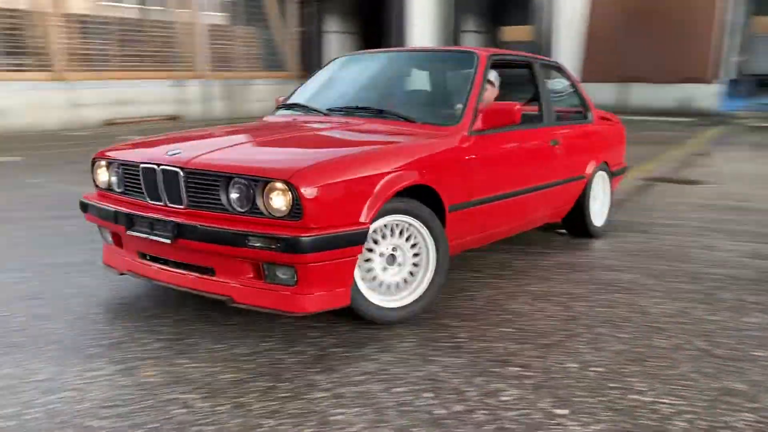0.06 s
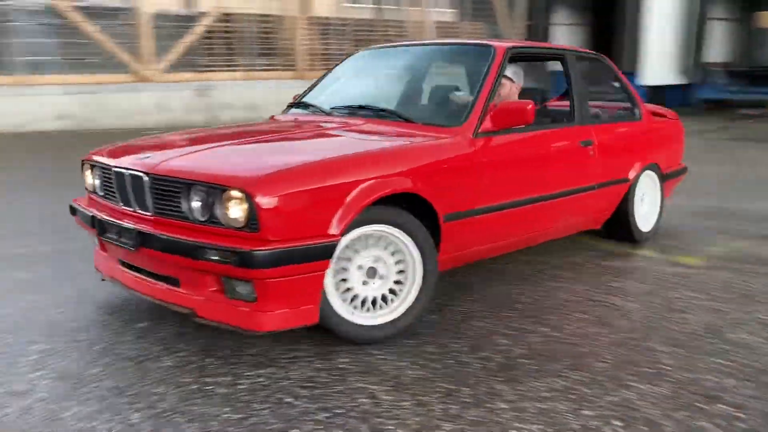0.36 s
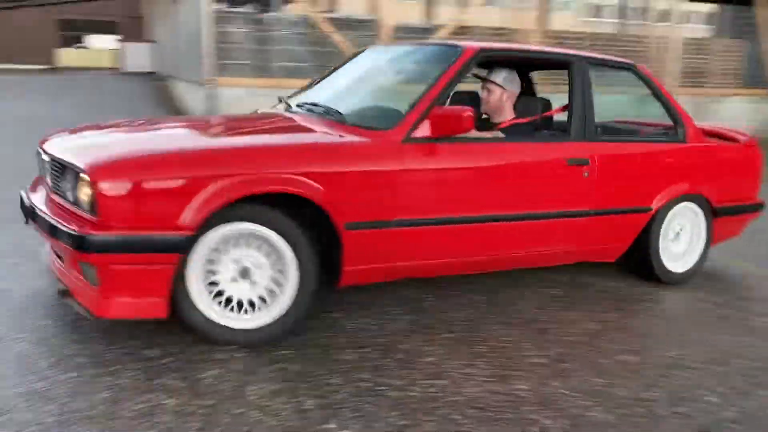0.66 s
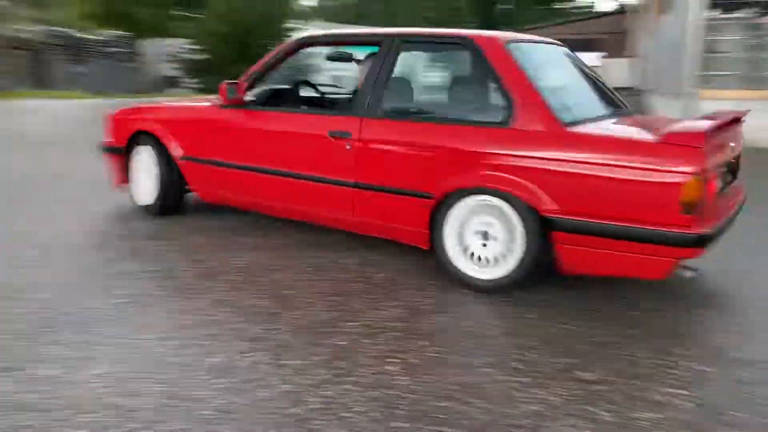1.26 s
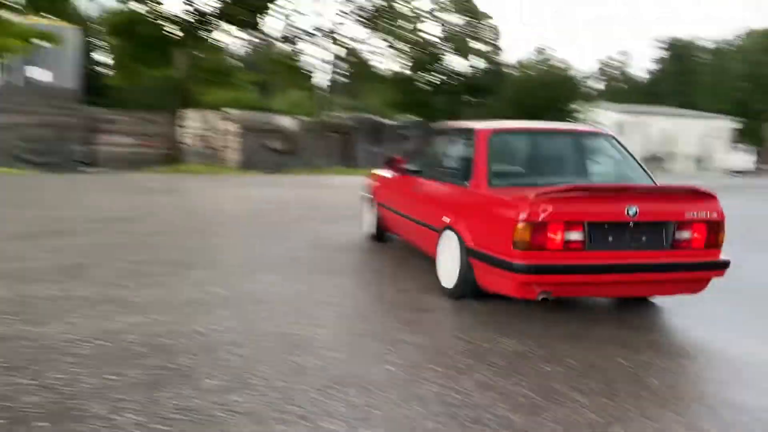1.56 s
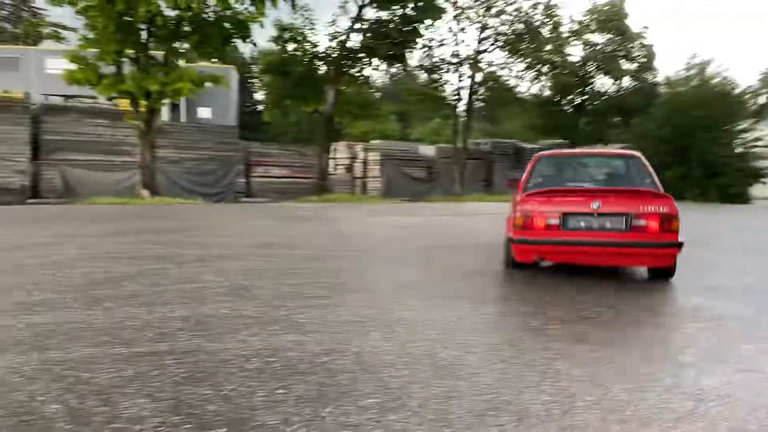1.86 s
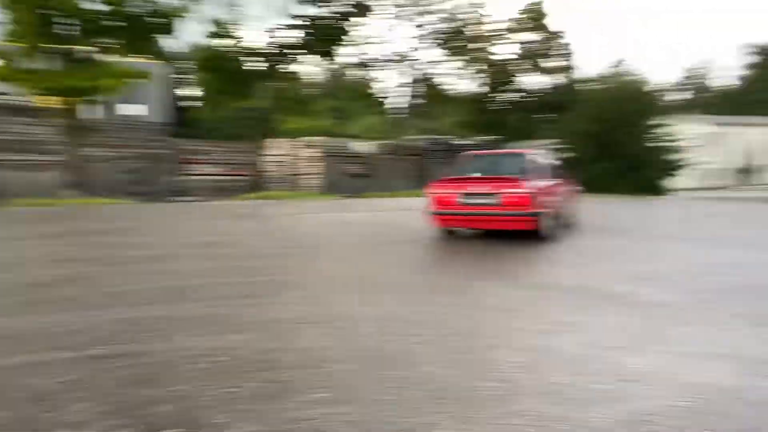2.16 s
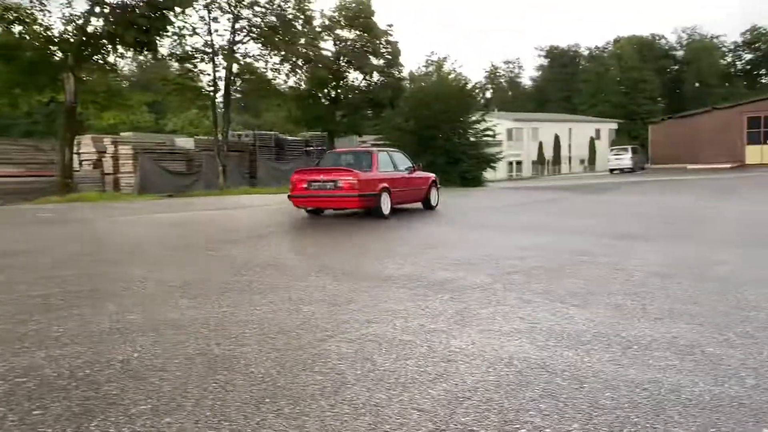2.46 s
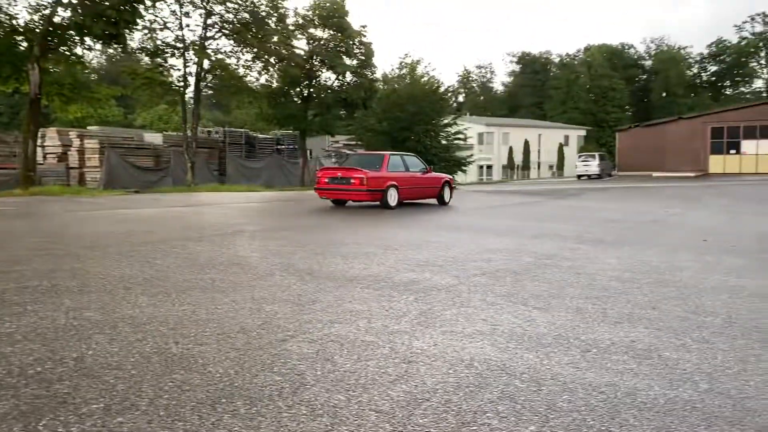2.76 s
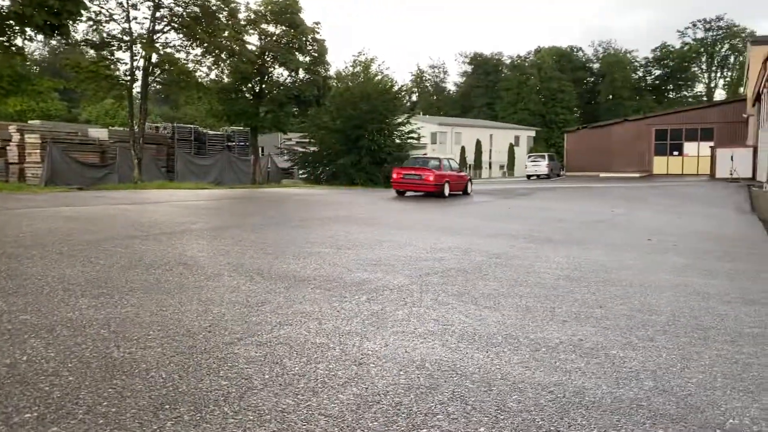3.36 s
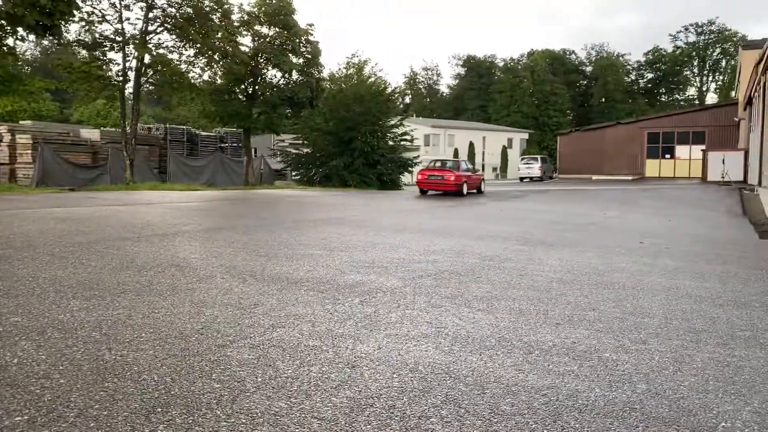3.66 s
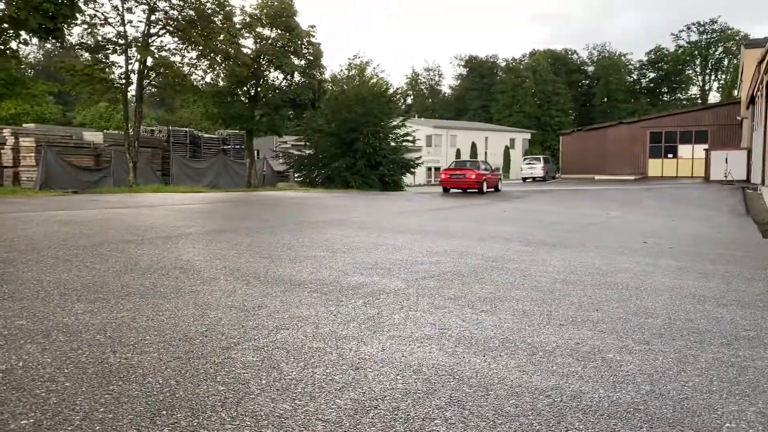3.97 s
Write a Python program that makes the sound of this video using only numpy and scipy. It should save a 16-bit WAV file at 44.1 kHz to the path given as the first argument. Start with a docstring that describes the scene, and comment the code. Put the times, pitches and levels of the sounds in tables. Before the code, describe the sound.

A car drifts past with a booming exhaust and hissing, chirping tyres, fading into the distance.

```python
"""An open yard, wet asphalt: a four-cylinder car drifts past close by and slides away.
The exhaust booms, growls and puffs at the firing rate, unequal cylinders add a burble, and each firing
rings the engine into a rasp. The tyres scrub, stick and slip in short squeals, throw spray and flick grit.
Wind buffets the microphone; sheds and stacks return dull echoes."""
import sys
import numpy as np
from scipy import signal
from scipy.fft import rfft, irfft
from scipy.io import wavfile

SR = 44100
rng = np.random.default_rng(int(sys.argv[2]) if len(sys.argv) > 2 else 0)


def wav_record(signal):
    """Record a signal, one row per channel, as 16-bit PCM in the file named by sys.argv[1]."""
    frames = np.transpose(np.atleast_2d(signal))
    bounded = np.clip(frames, -1, 1)
    # unit amplitude maps onto the largest positive 16-bit level
    quanta = np.round(bounded * 32767).astype(np.int16)
    wavfile.write(sys.argv[1], SR, quanta)


N = 176400


def from_db(db):
    """Decibels to gain."""
    return 10 ** (np.asarray(db) / 20)


def unit_rms(x):
    """Scale to rms 1."""
    return x / np.sqrt(np.mean(x ** 2) + 1e-20)


def in_time(rows):
    """Table columns as curves over time."""
    times, *columns = np.transpose(rows)
    return [np.interp(np.arange(N) / SR, times, column) for column in columns]


def per_bin(points):
    """A table over log frequency, read at every FFT bin."""
    hz, value = np.transpose(points)
    return np.interp(np.log(np.arange(N // 2 + 1) * SR / N + 1), np.log(hz), value)


def coloured(x, spectrum_db):
    """Filter by a spectrum table; rms 1."""
    return unit_rms(irfft(rfft(x) * from_db(per_bin(spectrum_db)), N))


def drift(corner_hz):
    """Low-passed random wander; rms 1."""
    hz = np.arange(N // 2 + 1) * SR / N
    return unit_rms(irfft(rfft(rng.standard_normal(N)) / (1 + (hz / corner_hz) ** 2), N))


def pan(x, db):
    """Stereo, left louder than right by db."""
    return x * from_db(np.array([[.5], [-.5]]) * db)


# Each row: frequency in Hz, left-right correlation of tyre and gas noise (-1 to 1).
CORRELATION = [(200, 0.82), (600, 0.63), (1000, 0.37), (2200, 0.56), (3300, 0.38), (7000, 0.21),
               (8400, 0.16), (11000, -0.12), (13400, 0.23), (15400, 0.11)]

def wide_noise(spectrum_db):
    """Coloured stereo noise, partly correlated; rms 1."""
    mid, side = rfft(rng.standard_normal((2, N)))
    alike = per_bin(CORRELATION)
    channels = np.sqrt(1 + alike) * mid + np.sqrt(1 - alike) * side * [[1], [-1]]
    return coloured(irfft(channels, N), spectrum_db)


# Each row: time in seconds, firing rate in Hz.
FIRING_HZ = [(0, 208), (.09, 186.6), (.17, 185.3), (.38, 197.7), (.44, 191.5), (.54, 170), (.68, 165.6),
             (.85, 153), (1.1, 164.6), (1.19, 159.8), (1.29, 143.7), (1.45, 149.1), (2.0, 179.3),
             (2.33, 198.8), (2.5, 210.5), (2.75, 211.6), (3.05, 203.2), (3.35, 165.6), (3.65, 145.1),
             (4, 128.9)]

def firing_cycles():
    """Running count of firings; engine speed wanders slightly."""
    return np.cumsum(in_time(FIRING_HZ)[0] * (1 + .003 * drift(17.7))) / SR


def order_tone(cycles, multiple, db, waver_db):
    """One engine order: a sine locked to the crank, wavering in level."""
    gain = np.sqrt(2) * from_db(db + waver_db * drift(7.9))
    return gain * np.sin(2 * np.pi * (multiple * cycles + rng.random()))


# Each row: time in seconds, boom level in dB.
BOOM_DB = [(0, -18), (.4, -16), (.55, -21), (.72, -19), (.85, -26), (1.03, -17), (1.15, -24), (1.38, -19),
           (1.48, -22), (1.53, -37), (1.59, -27), (1.95, -23), (2.2, -30), (2.32, -47), (2.4, -28.5),
           (2.505, -25), (2.53, -33.5), (2.68, -32), (2.74, -28.5), (2.85, -31.5), (2.98, -33.5),
           (3.09, -33.5), (3.2, -47.5), (3.4, -38.5), (3.6, -41.5), (3.92, -34), (4, -38)]
# The boom wavers more as the car draws away. Each row: time in seconds, spread in dB.
BOOM_WAVER_DB = [(0, -0.34), (2.5, 0), (2.85, 3), (3.3, 7.5), (4, 3)]
# Strongest from about 0.85 to 1.6 s. Each row: time in seconds, 2nd and 3rd harmonic in dB.
GROWL_DB = [(0, -52, -47), (.4, -44, -49.5), (.76, -56, -46), (.85, -32.5, -46), (1.05, -39.5, -41.5),
            (1.17, -56, -42.5), (1.33, -36, -45), (1.47, -34, -46), (1.62, -33.5, -38), (1.78, -49, -47),
            (2.1, -46.5, -50), (2.7, -43, -58), (3.2, -61, -71), (4, -61, -70)]
# Each row: time in seconds, burble gain in dB.
BURBLE_DB = [(0, -1), (.4, -10), (.55, 0), (.77, 1.5), (.85, 3), (1.12, 7.5), (1.25, -3), (1.6, -2.5),
             (1.9, -2), (2.3, -9), (2.7, -16), (3.2, -22), (4, -18)]
# Each row: multiple of the firing rate, level in dB before the burble gain.
BURBLE_ORDERS = [(.5, -40.5), (.75, -41), (1.25, -49), (1.5, -39.5), (2.5, -54.5)]

def exhaust(cycles):
    """Boom at the firing rate, growl from two overtones, burble from unequal cylinders."""
    boom_db = in_time(BOOM_DB)[0] + in_time(BOOM_WAVER_DB)[0] * drift(28.5)
    boom = np.sqrt(2) * from_db(boom_db) * np.sin(2 * np.pi * cycles)
    growl = sum(order_tone(cycles, k, db, waver_db=3) for k, db in enumerate(in_time(GROWL_DB), 2))
    burble_db, = in_time(BURBLE_DB)
    burble = sum(order_tone(cycles, k, burble_db + db, waver_db=2.5) for k, db in BURBLE_ORDERS)
    return boom + growl + burble


# Loudest while the pipe faces the microphone. Each row: time in seconds, level in dB.
PUFF_DB = [(0, -65), (1.15, -47), (1.35, -37), (1.58, -39.5), (1.85, -42), (2.15, -42), (2.9, -46),
           (4, -62)]
# Each row: frequency in Hz, relative level in dB.
PUFF_SPECTRUM_DB = [(150, 11), (330, 4), (450, 10), (700, 6.5), (1500, -18), (2100, -32), (2900, 1.5),
                    (4200, -5), (5500, -40), (12000, -45)]

def tailpipe(cycles, depth=.37):
    """Rushing gas, one puff per firing."""
    puffs = 1 + depth * np.sin(2 * np.pi * cycles)
    return from_db(in_time(PUFF_DB)[0]) * puffs * wide_noise(PUFF_SPECTRUM_DB)


# Each row: time in seconds, rasp level in dB.
RASP_DB = [(0, -31.5), (.35, -31.5), (.75, -37), (1.05, -28.5), (1.25, -35.5), (1.5, -33), (1.8, -37),
           (2.05, -36), (2.3, -37.5), (2.8, -35.5), (3.1, -70), (4, -57)]
# Each row: frequency in Hz, relative level in dB.
RASP_SPECTRUM_DB = [(300, -35), (480, -7.5), (610, -5.5), (780, 1), (1030, 4), (1350, -3.5), (1560, -14.5),
                    (1880, -4.5), (2200, -9), (2600, -16.5), (3400, -19.5), (4600, -31.5), (8000, -39)]

def rasp(cycles, cylinders=4, cylinder_spread=.49, roughness=.59, decay_s=.0052):
    """Each firing sets off a brief broadband ring, slightly different for each cylinder."""
    firings = np.flatnonzero(np.diff(np.floor(cycles)))
    t, out = np.arange(SR // 25) / SR, np.zeros(N)
    shared = rng.standard_normal(len(t))
    strength = 1 + roughness * rng.standard_normal(N)
    for k in range(cylinders):
        clicks = np.zeros(N)
        clicks[firings[k::cylinders]] = strength[k:len(firings):cylinders]
        noise = shared + cylinder_spread * rng.standard_normal(len(t))
        spectrum = rfft(noise * np.exp(-t / decay_s))
        white_ring = irfft(spectrum / np.abs(spectrum))
        out += signal.fftconvolve(clicks, white_ring)[:N]
    return from_db(in_time(RASP_DB)[0]) * coloured(out, RASP_SPECTRUM_DB)


# Each row: start and length in seconds, start and end pitch in Hz, level in dB,
# octave in dB relative to the tone, roughness (0 to 1).
SQUEAL_BURSTS = [(-.02, 0.033, 917, 976, -16, -12, 0.28), (0.017, 0.024, 1032, 980, -23, -18, .6),
                 (0.076, 0.026, 976, 944, -35, -20, .5), (0.162, 0.025, 1140, 1133, -21, -27, 0.26),
                 (0.182, 0.028, 1090, 1156, -17.5, -24, 0.16), (.24, .06, 895, 1001, -23, -24, 0.42),
                 (0.346, .065, 1004, 1032, -35, -3.5, 0.9), (0.495, 0.023, 963, 939, -24, -10.5, 0.17),
                 (0.538, 0.047, 980, 938, -29.5, -18, 0.5), (0.701, 0.021, 865, 900, -26.5, -18, 0.9),
                 (0.804, 0.03, 817, 857, -31.5, -25, .7), (2.135, 0.036, 869, 904.4, -37, -24, 0.88),
                 (2.175, 0.0862, 832, 752, -35.5, -9, 0.7), (2.259, 0.073, 742, 742, -32, -8.5, 0.34),
                 (2.354, 0.075, 701, 731, -33.5, -3.5, 0.34), (2.426, 0.095, 935.6, 862.5, -22, -13, 0.19),
                 (2.525, 0.088, 848.4, 828, -28, -6.5, 0.63), (2.609, 0.079, 833, 808.8, -27, -8, 0.8),
                 (2.678, 0.097, 772, 776.4, -29, -10, 0.73), (2.785, 0.15, 810, 835, -36.5, -10.5, .9)]

def squeals(attack_s=.008, release_s=.023, width_hz=136):
    """Tread sticks and slips: a gliding tone and its octave, roughened by blocks slipping out of step."""
    t, out = np.arange(N) / SR, np.zeros(N)
    jitter = 1 + .021 * drift(148)
    flutter = from_db(.06 * drift(31))
    scatter = np.array([drift(width_hz) + 1j * drift(width_hz) for _ in range(2)])
    for start_s, length_s, start_hz, end_hz, db, octave_db, rough in SQUEAL_BURSTS:
        on = (t > start_s) & (t < start_s + length_s + release_s / 2)
        age = t[on] - start_s
        tone, octave = (1 + rough * scatter[:, on]) / np.sqrt(1 + 2 * rough ** 2)
        hz = (start_hz + (end_hz - start_hz) * age / length_s) * jitter[on]
        phasor = np.exp(2j * np.pi * np.cumsum(hz) / SR)
        envelope = np.clip(np.minimum(age / attack_s, (length_s - age) / release_s + .5), 0, 1)
        wave = np.real(tone * phasor + from_db(octave_db) * octave * phasor ** 2)
        out[on] += from_db(db) * envelope * wave
    return np.sqrt(2) * out * flutter


# Each row: time in seconds, scrub level in dB, hiss level in dB.
SCRUB_HISS_DB = [(0, -31, -37.5), (.38, -32, -37), (.6, -31.5, -40), (.78, -34.5, -43), (.88, -33.5, -40.5),
                 (1.1, -32.5, -38.5), (1.22, -36.5, -42), (1.48, -32.5, -47), (1.8, -37, -48.5),
                 (2.08, -38, -52), (2.3, -36.5, -46.5), (2.5, -28.5, -43), (2.72, -33.5, -43),
                 (2.9, -33.5, -43.5), (3.1, -40.5, -51), (3.45, -44.5, -53), (3.7, -46, -57),
                 (4, -51, -60.5)]
# Each row: time in seconds, spray level in dB.
SPRAY_DB = [(0, -42.5), (.35, -39), (.56, -45.5), (.66, -40), (.78, -46.5), (.85, -36.5), (.93, -35.5),
            (1.13, -35.5), (1.2, -45.5), (1.25, -46), (1.29, -42), (1.8, -46.5), (2.12, -53), (2.65, -49.5),
            (2.88, -51), (3.1, -61), (3.45, -66.5), (3.7, -79), (4, -72)]
# Three spectra. Each row: frequency in Hz, relative level in dB.
SCRUB_SPECTRUM_DB = [(100, 6), (300, 1), (550, -4.5), (850, 0), (1100, 0.5), (1300, -1.5), (1540, -5),
                     (1950, -0.5), (2250, -2.5), (2700, -11), (5000, -30), (9000, -90)]
HISS_SPECTRUM_DB = [(800, -34), (2000, -1.5), (3500, 4), (5000, -1), (7000, -5.5), (9000, -25.5),
                    (12000, -12), (15000, -55)]
SPRAY_SPECTRUM_DB = [(2500, -69), (6000, -5.5), (8500, -7), (10800, -2.5), (12500, -14.5), (14500, -9.5),
                     (15800, -6.5)]

def wet_tyres(scrub_pan_db, drops_per_s=600, drops_db=-16, drop_spread_db=6.5):
    """Rubber scrubs over stones; the water film hisses, breaks into drops and flies off as spray."""
    scrub_db, hiss_db = in_time(SCRUB_HISS_DB)
    hits = rng.random(N) < drops_per_s / SR
    sizes = from_db(drop_spread_db * np.minimum(rng.exponential(1, N), 4))
    drops = coloured(hits * sizes * rng.standard_normal((2, N)), HISS_SPECTRUM_DB)
    scrub = from_db(scrub_db + .5 * drift(17)) * wide_noise(SCRUB_SPECTRUM_DB)
    hiss = from_db(hiss_db) * (wide_noise(HISS_SPECTRUM_DB) + from_db(drops_db) * drops)
    spray = wide_noise(SPRAY_SPECTRUM_DB) * from_db(in_time(SPRAY_DB)[0] + 1.44 * drift(16))
    return pan(scrub, scrub_pan_db) + pan(hiss, db=2) + spray


# Each row: start in seconds, peak in dB, band centre in Hz.
GRIT_TICKS = [(1.447, -27.5, 3097), (1.512, -30.5, 3700), (1.549, -22.5, 2136), (1.776, -32.5, 4787)]

def grit(decay_s=.0058):
    """Small stones tick against the wheel arches."""
    t, out = np.arange(N) / SR, np.zeros(N)
    for start_s, db, hz in GRIT_TICKS:
        envelope = (t > start_s) * np.exp(-np.minimum(np.abs(t - start_s) / decay_s, 20))
        band = signal.butter(2, [hz / np.sqrt(2), hz * np.sqrt(2)], "band", fs=SR, output="sos")
        tick = signal.sosfilt(band, rng.standard_normal(N) * envelope + 1e-18)
        out += from_db(db) * tick / np.abs(tick).max()
    return out


# Each row: time in seconds, wind level in dB.
WIND_DB = [(0, -41), (.68, -41.5), (.77, -27.5), (.86, -40), (1.12, -33.5), (1.23, -23), (1.38, -34),
           (1.85, -36), (2.1, -44), (2.39, -38), (2.75, -42), (2.88, -30.5), (3.08, -37), (3.26, -33.5),
           (3.5, -34.5), (3.74, -31.5), (4, -42)]
# Each row: frequency in Hz, relative level in dB.
WIND_SPECTRUM_DB = [(20, -29), (35, -11), (55, 1), (85, -0.5), (125, -1), (200, -8), (300, -16),
                    (600, -31.5), (1500, -71)]

def wind(lump_db=1.8, side_db=-9.5):
    """Lumpy low buffeting on the microphone."""
    mid, side = [coloured(white, WIND_SPECTRUM_DB) for white in rng.standard_normal((2, N))]
    gusts = from_db(in_time(WIND_DB)[0] + lump_db * drift(13))
    return gusts * (mid + from_db(side_db) * side * [[1], [-1]])


def yard_echoes(x, count=40, span_s=.22, band_hz=(400, 2570), gain_db=-6.5):
    """Scattered dull echoes off sheds and stacks, thin in the bass."""
    response = np.zeros((2, SR))
    for channel, lags in zip(response, rng.random((2, count))):
        taps = ((lags + .02) * span_s * SR).astype(int)
        channel[taps] = (1 - lags) ** 2 * rng.choice([-1, 1], count)
    response /= np.sqrt(np.sum(response ** 2) / 2)
    echoes = signal.fftconvolve(x[None], response, axes=1)[:, :N]
    band = signal.butter(2, band_hz, "band", fs=SR, output="sos")
    return from_db(gain_db) * signal.sosfilt(band, echoes)


# Each row: centre in seconds, depth in dB.
BASS_DIPS_DB = [(2.665, 23), (2.901, 10), (3.022, 0), (3.115, 17), (3.325, 8), (3.806, 8)]

def bass_dips(width_s=.013):
    """Gain for exhaust and wind: the level dips briefly."""
    t = np.arange(N) / SR
    return from_db(-sum(db * np.exp(-((t - s) / width_s) ** 2) for s, db in BASS_DIPS_DB))


# Balance of exhaust and midrange as the car turns. Each row: time in seconds, left minus right in dB.
EXHAUST_PAN_DB = [(0, -3.5), (1.7, -3), (2.3, -4), (4, -6.5)]
MID_PAN_DB = [(0, -4), (.88, 0.2), (1.5, -2), (2.0, -4.5), (2.5, 0), (2.9, -1.5), (4, -1.8)]

def scene(right_delay_s=.00003):
    """Car, echoes and wind; the left channel leads slightly."""
    cycles = firing_cycles()
    mid_pan_db, = in_time(MID_PAN_DB)
    bright = rasp(cycles) + squeals() + grit()
    low = (pan(exhaust(cycles), in_time(EXHAUST_PAN_DB)[0]) + wind()) * bass_dips()
    tyres = wet_tyres(mid_pan_db)
    left, right = low + pan(bright, mid_pan_db) + yard_echoes(bright) + tyres + tailpipe(cycles)
    hz = np.arange(N + 1) * SR / (2 * N)
    delay = np.exp(-2j * np.pi * hz * right_delay_s)
    return np.array([left, irfft(rfft(right, 2 * N) * delay)[:N]])


def record(dry, fade_in_s=.003, low_cut_hz=48, high_cut_hz=15800):
    """The microphone sheds the deepest rumble; the top is cut steeply."""
    faded = dry * np.minimum(np.arange(N) / SR / fade_in_s, 1)
    thinned = signal.sosfilt(signal.butter(3, low_cut_hz, "high", fs=SR, output="sos"), faded)
    return signal.sosfilt(signal.ellip(10, .2, 80, high_cut_hz, fs=SR, output="sos"), thinned)


dry = scene()
out = record(dry)
wav_record(out)
```